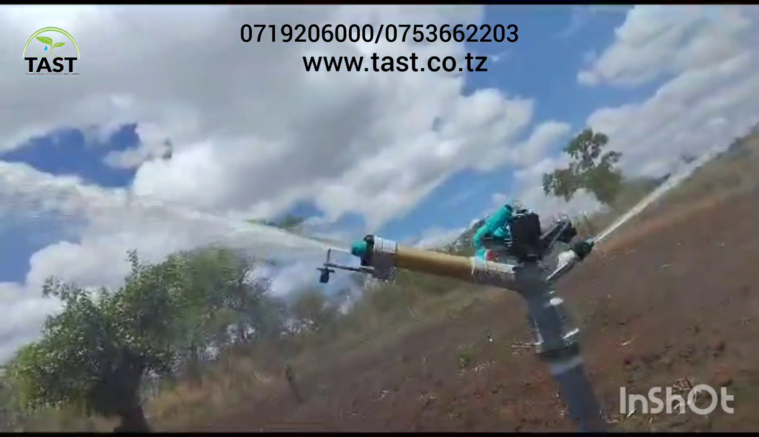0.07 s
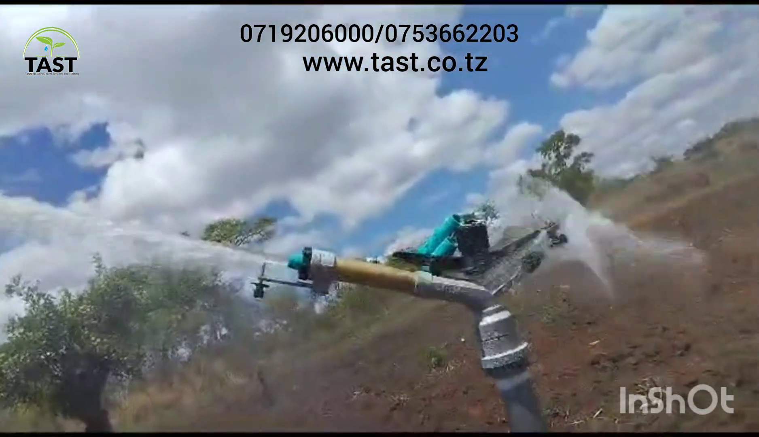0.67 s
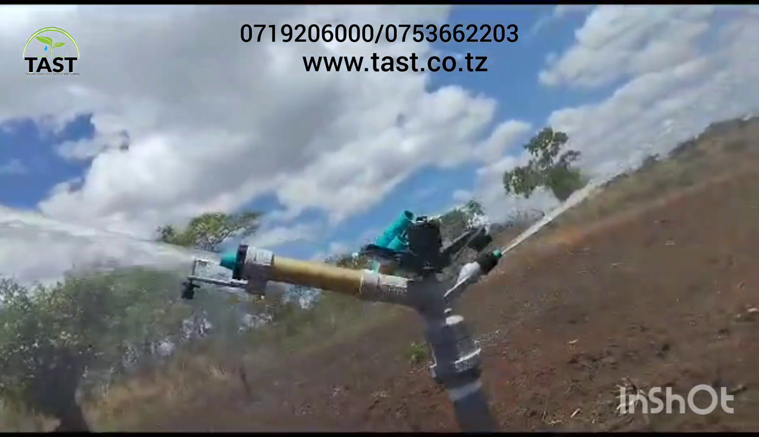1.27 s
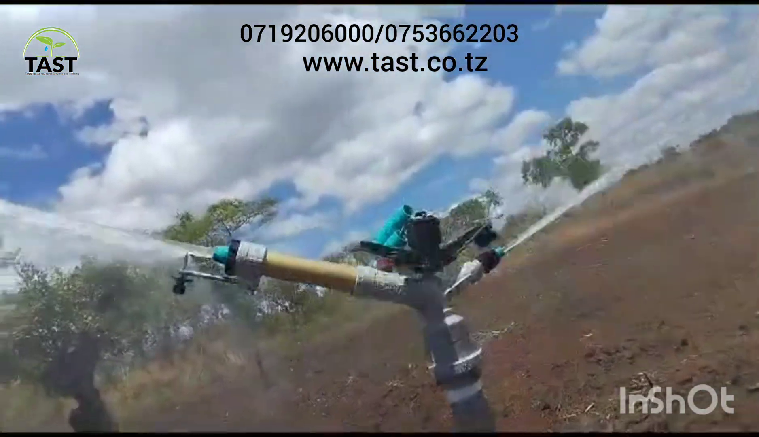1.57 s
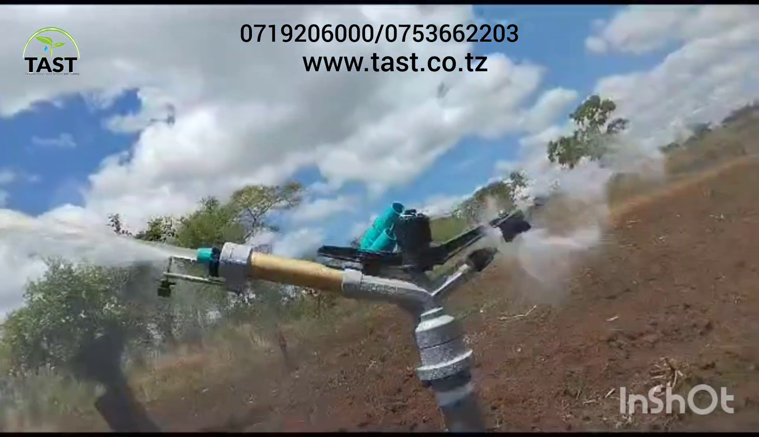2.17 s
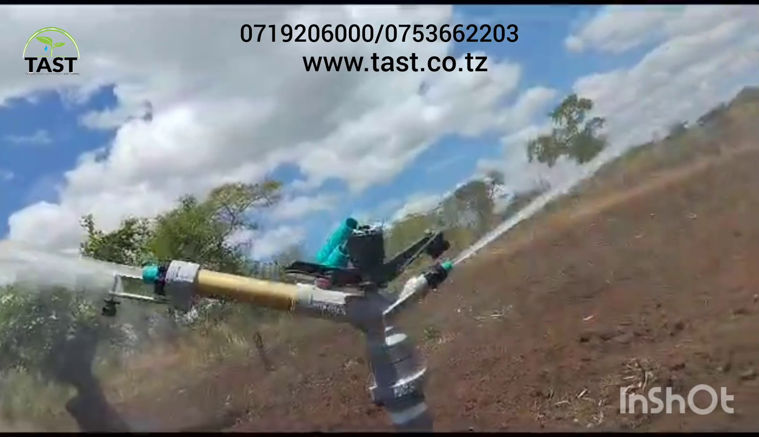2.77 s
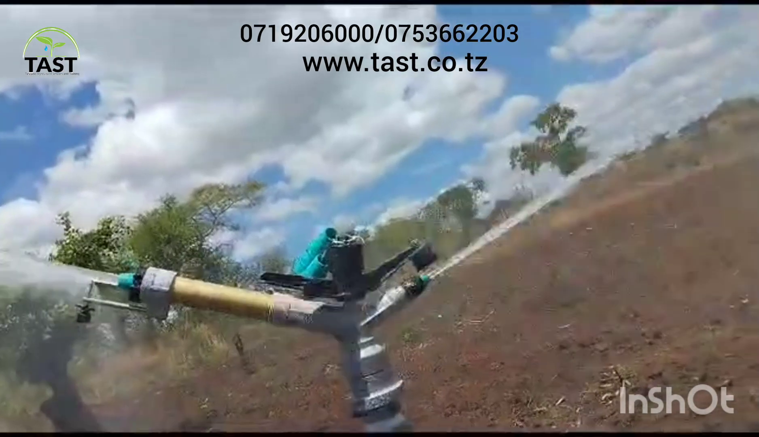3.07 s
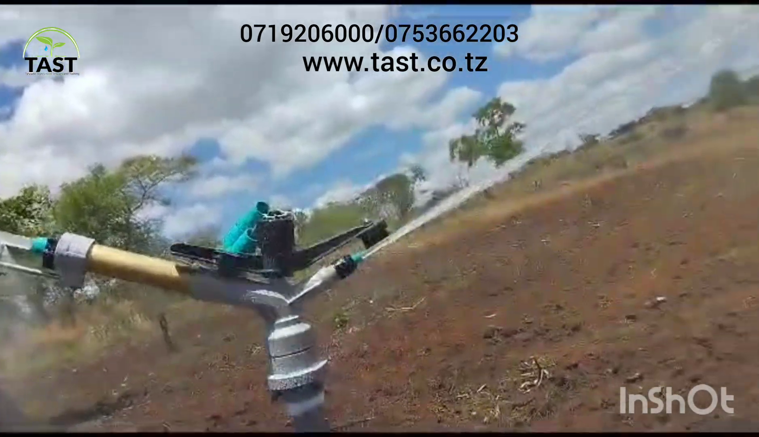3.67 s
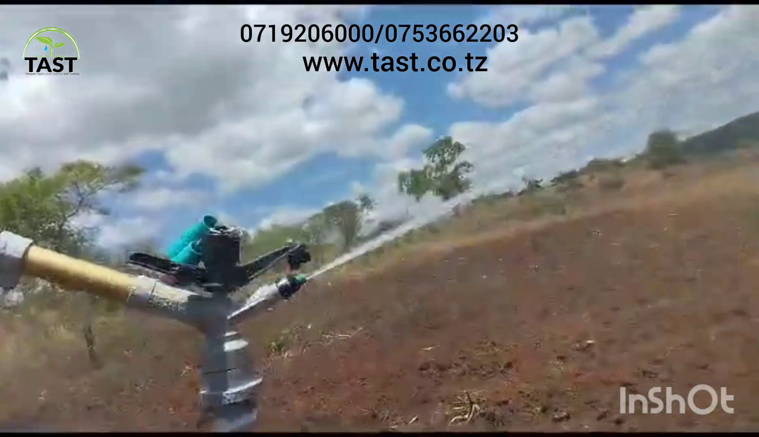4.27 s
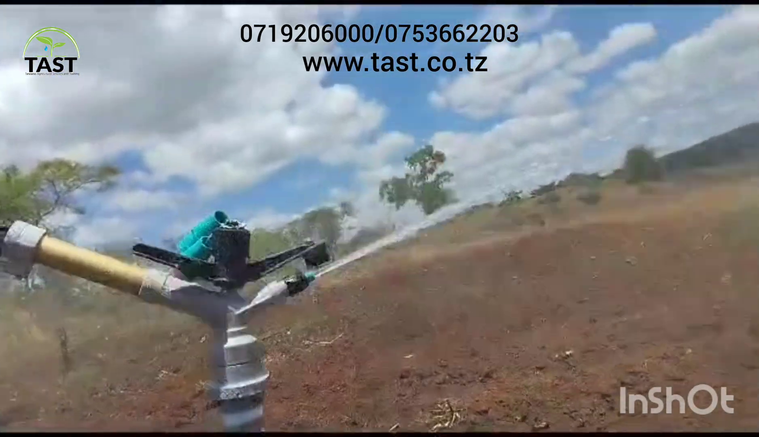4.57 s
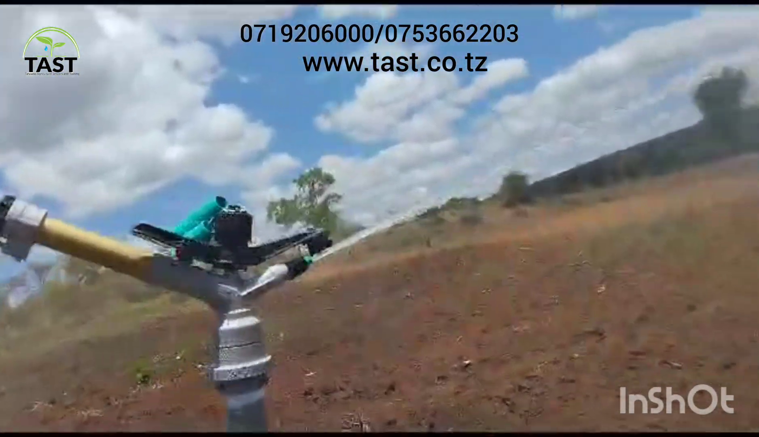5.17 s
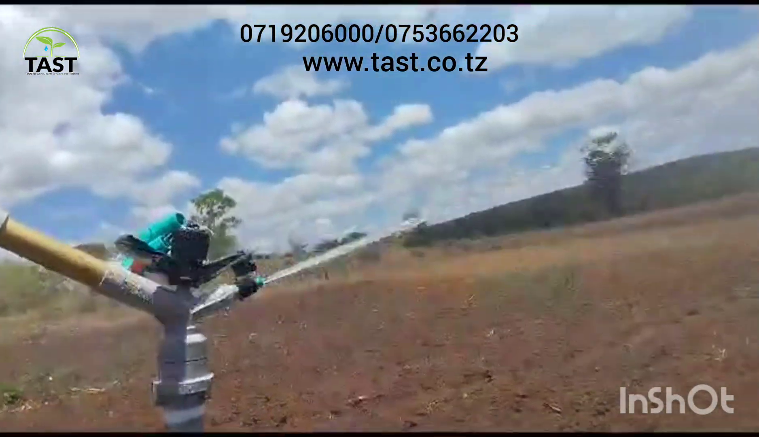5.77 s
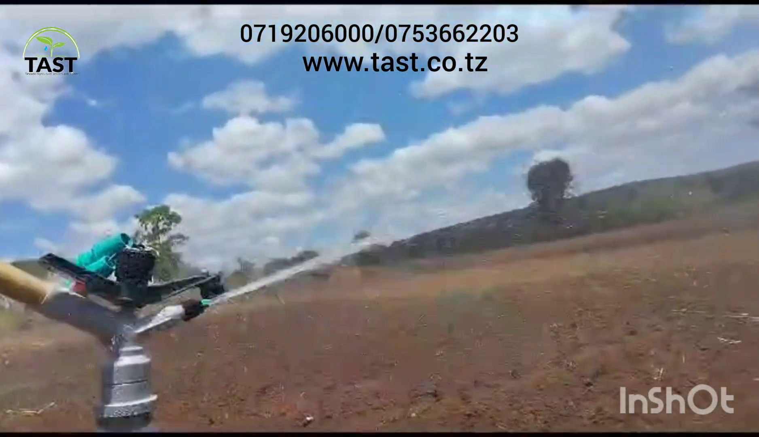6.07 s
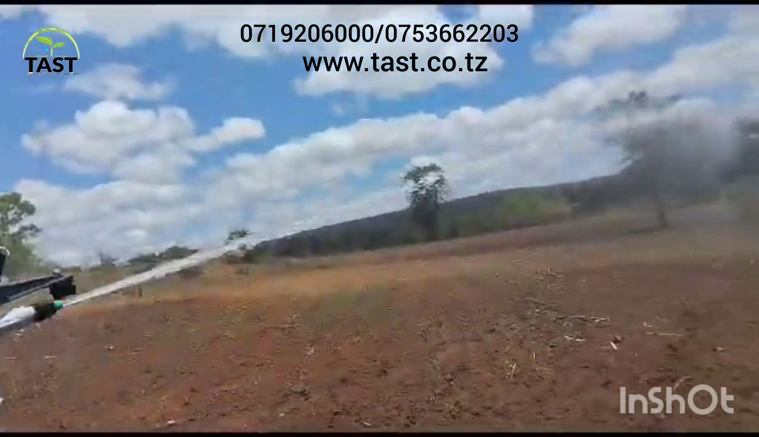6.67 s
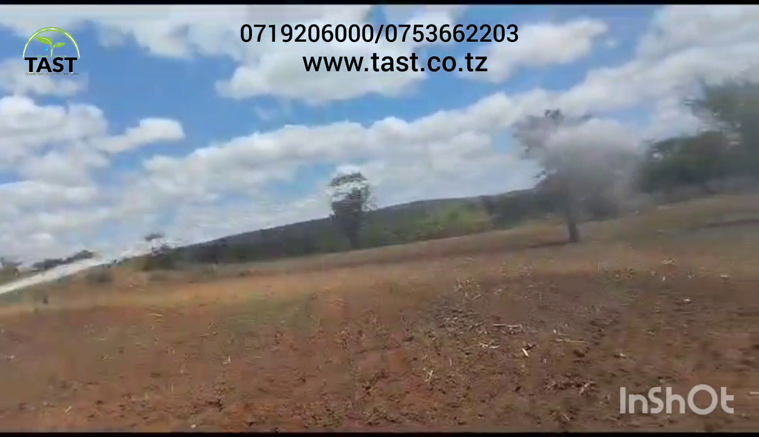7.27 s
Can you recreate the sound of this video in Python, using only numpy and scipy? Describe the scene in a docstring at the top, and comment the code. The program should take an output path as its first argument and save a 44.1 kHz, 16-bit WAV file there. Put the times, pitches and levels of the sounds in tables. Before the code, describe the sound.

A big impact sprinkler hisses steadily close by, its arm clacking and splashing in a regular rhythm while wind buffets the microphone.

```python
"""A dry field, close to a big turning impact sprinkler. Its jet roars and hisses steadily; 2.6 times a
second the drive arm slaps into the water, throws a burst of spray, gulps as its spoon fills, strikes
the body and clacks back onto its stop. Gusts buffet the microphone, whose gain ducks under loud
strokes; stray drops tick nearby."""
import sys
import numpy as np
from scipy import signal
from scipy.fft import rfft, irfft, next_fast_len
from scipy.io import wavfile
from scipy.ndimage import uniform_filter1d, minimum_filter1d, map_coordinates

SR = 44100
rng = np.random.default_rng(int(sys.argv[2]) if len(sys.argv) > 2 else 0)


def file_out(sig):
    """Save sig as 16-bit WAV at sys.argv[1]."""
    # one column per channel
    cols = np.atleast_2d(sig).T
    # limit, then scale
    lim = np.clip(cols, -1, 1)
    pcm = np.round(lim * 32767).astype(np.int16)
    wavfile.write(sys.argv[1], SR, pcm)


N = 327663


def amp(db):
    """Decibels to gain."""
    return 10 ** (np.asarray(db) / 20)


def unit(x):
    """Scale to rms 1."""
    return x / np.sqrt(np.mean(x ** 2) + 1e-20)


def decay(t, t60):
    """Exponential fall, 60 dB in t60 seconds."""
    return amp(-60 * t / t60)


def at(rows, s):
    """Each column after the time, interpolated at s seconds."""
    times, *cols = np.transpose(rows)
    return [np.interp(s, times, c) for c in cols]


def curves(rows):
    """Each column after the time, one value per sample."""
    return at(rows, np.arange(N) / SR)


def add(track, s, sound):
    """Mix a sound into the track at s seconds."""
    start = max(0, round(s * SR))
    part = sound[:max(0, N - start)]
    track[start:start + len(part)] += part


def wobble(rate_hz, size=N):
    """Smooth random curve, rate_hz knots a second."""
    knots = rng.standard_normal(int(size * rate_hz / SR) + 4)
    return map_coordinates(knots, [np.arange(size) * rate_hz / SR])


def colour(x, spectrum):
    """Shape x by (f/Hz, level/dB) points on a log axis; rms 1."""
    hz, db = np.transpose(spectrum)
    m = next_fast_len(len(x) + 8192)
    gain = amp(np.interp(np.log(np.fft.rfftfreq(m, 1 / SR) + 1), np.log(hz), db))
    return unit(irfft(rfft(x, m) * gain, m)[:len(x)])


def noise(spectrum, size=N):
    """Coloured noise; rms 1."""
    return colour(rng.standard_normal(size), spectrum)


def band(track, width_hz):
    """Narrow noise centred on (t/s, f/Hz) points; rms 1."""
    lowpass = signal.butter(2, width_hz, fs=SR, output="sos")
    swirl = signal.sosfilt(lowpass, rng.standard_normal((2, N)))
    phase = 2 * np.pi * np.cumsum(curves(track)[0]) / SR
    return unit(swirl[0] * np.cos(phase) + swirl[1] * np.sin(phase))


def patchy(x, depth_db, frames):
    """Random patches of gain, some 500 Hz wide."""
    z = signal.stft(x, nperseg=512)[2]
    field = uniform_filter1d(uniform_filter1d(rng.standard_normal(z.shape), 6, 0), frames, 1)
    return signal.istft(z * amp(depth_db * unit(field)), nperseg=512)[1][:len(x)]


def droplets(per_s, spread_db, grain_db):
    """Tiny impacts of scattered size on a bed of smooth noise; rms 1."""
    hits = (rng.random(N) < per_s / SR) * amp(spread_db * np.clip(rng.standard_normal(N), -2, 2))
    grains = unit(hits * rng.choice([-1, 1], N))
    return unit(amp(grain_db) * grains + rng.standard_normal(N))


# Spectra of roar, hiss and mist: f/Hz, level/dB
ROAR_SPECTRUM = [(100, -15.5), (450, 2), (800, -1.5), (1150, -5), (1500, 1.5), (2100, 3), (2550, -5),
                 (3050, -1.5), (4200, -6), (4900, -4.5), (6500, -9.5), (12000, -37)]
HISS_SPECTRUM = [(2500, -5), (4500, -19), (5800, -2.5), (6900, 2), (8400, 2), (10000, -2.5), (11200, -7),
                 (12400, -3.5), (13700, -8.5), (16000, -6.5)]
MIST_SPECTRUM = [(5000, -16.5), (7500, -3), (8800, -2.5), (10000, 0), (11500, -4), (14000, -8), (16000, -5)]
# Roar and hiss over time; the roar sinks briefly near 6.65 s: t/s, roar level/dB, hiss level/dB
STREAM_LEVELS = [(0, -35.5, -32.5), (1.5, -34, -32), (3.1, -34, -34), (4.9, -35.5, -35.5), (5.9, -35, -32),
                 (6.65, -37, -33), (7.4, -34.5, -31.5)]
# Hollow note of the nozzle: t/s, f/Hz
NOZZLE_NOTE = [(0, 1605), (1.2, 1623), (3.3, 1961), (6.4, 1935), (7.4, 2104)]
# Thin sheen in the hiss: t/s, f/Hz, level/dB re hiss
HISS_SHEEN = [(0, 12300, -29), (1.4, 12140, -7.5), (2.6, 12340, -9.5), (3.2, 14400, -17),
              (3.9, 14450, -8.5), (5.6, 13320, -11), (7.4, 12500, -28)]


def jet(nozzle_db=-7.5):
    """The stream roars with the nozzle's hollow note and hisses as it tears into drops."""
    roar_db, hiss_db = curves(STREAM_LEVELS)
    roar = noise(ROAR_SPECTRUM) + amp(nozzle_db) * band(NOZZLE_NOTE, width_hz=200)
    tearing = patchy(droplets(per_s=1200, spread_db=4.5, grain_db=-8), depth_db=1.2, frames=60)
    sputter = unit(amp(6.5 * np.minimum(wobble(330), 2.6)))  # the finest drops come in spits
    sheen = amp(curves(HISS_SHEEN)[1]) * band(HISS_SHEEN, width_hz=440)
    fizz = amp(-4.5) * patchy(noise(MIST_SPECTRUM), depth_db=1.5, frames=90)
    hiss = colour(tearing, HISS_SPECTRUM) + sputter * (sheen + fizz)
    return amp(roar_db + 0.54 * wobble(13)) * roar + amp(hiss_db + 0.87 * wobble(70)) * hiss


# Spectra of eddies, large to small: f/Hz, level/dB
RUMBLE_SPECTRUM = [(10, -10), (25, 0.5), (50, -0.5), (100, -4.5), (150, -18), (300, -46), (700, -77)]
FLUTTER_SPECTRUM = [(50, -23), (120, 1.5), (180, -0.5), (250, -7.5), (340, -16.5), (700, -27), (1500, -49)]
BUFFET_SPECTRUM = [(180, 4), (320, 4.5), (480, -1), (750, -19.5), (1500, -33)]
# Wind strength: t/s, rumble level/dB
WIND_LEVEL = [(0, -20.5), (.3, -17.5), (.66, -15.5), (.73, -36), (.83, -22), (1.06, -17.5), (1.12, -29.5),
              (1.18, -17), (1.5, -20), (2.35, -19), (2.86, -19), (2.96, -26.5), (3.7, -24.5), (3.9, -40),
              (5.56, -35), (5.66, -27.5), (6.05, -33.5), (6.48, -32), (6.64, -39.5), (7.32, -28.5),
              (7.43, -35)]
# Hardest buffets: t/s, level/dB, half-width/s
HARD_BUFFETS = [(0.258, -22.5, 0.056), (1.24, -25, 0.05), (2.615, -33, 0.035)]


def wind(full_gust_db=-19):
    """Eddies rumble on the microphone; faster air makes smaller ones that flutter and buffet."""
    t = np.arange(N) / SR
    wind_db, = curves(WIND_LEVEL)
    gust_db = wind_db - full_gust_db
    swells = unit(amp(1.16 * wobble(20) + 2.1 * wobble(60)))
    rumble = amp(wind_db) * noise(RUMBLE_SPECTRUM)
    lumps = amp(3.2 * wobble(45) + 2 * np.minimum(wobble(18), 1))
    flutter = amp(-24 + 1.63 * gust_db) * unit(noise(FLUTTER_SPECTRUM) * lumps)
    peaks = sum(amp(db) * np.exp(-((t - s) / width_s) ** 2) for s, db, width_s in HARD_BUFFETS)
    buffet = (amp(-42.5 + 2.5 * gust_db) + peaks) * unit(noise(BUFFET_SPECTRUM) * lumps)
    return swells * (rumble + flutter + buffet)


def throw(t, lead_s=0.030, hold_s=0.054, rise_db_per_s=5000, fall_db_per_s=1100):
    """Envelope of thrown water, t seconds from the strike; it dips while the spoon fills."""
    early = np.maximum(-lead_s - t, 0)
    late = np.maximum(t + lead_s - hold_s, 0)
    dip_db = 2 * np.exp(-((t + 0.007) / 0.0056) ** 2)
    return amp(-rise_db_per_s * early - fall_db_per_s * late - dip_db)


# Arm strokes: strike t/s, relative level/dB
ARM_STROKES = [(0.1166, 0.5), (0.4969, 1), (0.8763, -1.5), (1.255, -1), (1.6354, 0.5), (2.0153, -2.5),
               (2.397, 0), (2.7797, 2), (3.159, 3), (3.538, 3), (3.9193, 0.5), (4.2994, 1.5), (4.679, 0.5),
               (5.0598, 1), (5.441, 0), (5.8221, 0.5), (6.204, -2), (6.586, -4.5), (6.9697, -3),
               (7.3503, -2.5)]
# Spectrum of coarse drops: f/Hz, level/dB
SPRAY_SPECTRUM = [(150, -42), (400, -10), (1000, -26), (1500, -5.5), (2600, -6), (3400, -2), (5200, -2.5),
                  (6300, 4.5), (7800, 4), (9000, 3.5), (11000, -40)]
# Sharpest part of the splash as the fan of water swings: t/s, f/Hz
SPLASH_PEAK = [(.1, 8150), (.5, 7750), (2.7, 8300), (3.6, 8100), (4.3, 6450), (5.1, 6420), (6.6, 8000),
               (7.35, 7400)]
# Ring of the splash in the wet arm: t/s, level/dB re splash
WET_RING_LEVEL = [(0, -20), (1.7, -15), (2.8, -9.5), (3.8, -24), (6.2, -15), (7.1, -6)]
# Mist as the sprinkler turns: t/s, level/dB
MIST_LEVEL = [(.1, -19), (1.3, -17), (2.5, -17), (3.2, -15.5), (4.4, -19.5), (5.4, -15.5), (6.6, -16),
              (7.35, -18.5)]


def spray(swell_db_per_s=70, mist_lead_s=0.00089, push_lead_s=0.023, ring_hz=4290):
    """The arm shatters the jet into coarse drops and fine mist, with a low push on entry."""
    coarse, fine, push = np.zeros((3, N))
    t = np.arange(-SR // 20, SR // 10) / SR
    for s, strength_db in ARM_STROKES:
        add(coarse, s + t[0], amp(-19 + 0.72 * strength_db + swell_db_per_s * t) * throw(t))
        add(fine, s + t[0], amp(at(MIST_LEVEL, s)[0]) * throw(t + mist_lead_s))
        add(push, s + t[0], amp(-31) * np.exp(-((t + push_lead_s) / 0.014) ** 2))
    drops, mist = [patchy(droplets(per_s=5000, spread_db=3.5, grain_db=-2), depth_db=2, frames=6)
                   for _ in range(2)]
    wet_ring = amp(curves(WET_RING_LEVEL)[0]) * band([(0, ring_hz)], width_hz=220)
    splash = colour(drops, SPRAY_SPECTRUM) + amp(-4.5) * band(SPLASH_PEAK, width_hz=390) + wet_ring
    surge = amp(1.4 * wobble(450))
    thud = noise(RUMBLE_SPECTRUM) + amp(-12) * noise(FLUTTER_SPECTRUM)
    return (coarse * splash + fine * colour(mist, MIST_SPECTRUM)) * surge + push * thud


# Arm modes: f/Hz, t60/s, slap level/dB, strike level/dB, stop level/dB
ARM_MODES = [(1517, 0.025, -10.5, -15, -11), (1800, 0.022, -27, -28, -15), (2220, 0.043, -13, -34, -7.5),
             (3176, 0.022, 2, -7, 2.5), (3329, 0.037, -5.5, -7.5, 9.5), (3980, 0.034, -14, -2, -3),
             (4300, 0.032, -12.5, -2.5, 2), (4580, 0.023, -15, -1, -11), (5043, 0.061, -14.5, -10.5, 12.5),
             (8700, 0.081, -23, -4, -17), (9600, 0.012, -1, 9.5, -8), (12100, 0.058, -15, -4, 0),
             (14300, 0.028, -20, -1.5, -10), (14780, 0.031, -20, -9, -4), (15800, .05, -13, -24, 0)]


def ring(levels_db, blur_rad, scatter_db=1.5, detune=0.0022, attack_s=0.0006):
    """The arm rings; water on it detunes and blurs each mode."""
    t = np.arange(SR // 10) / SR
    out = np.zeros(len(t))
    for (hz, t60, *_), db in zip(ARM_MODES, levels_db):
        phase = 2 * np.pi * (hz * (1 + detune * rng.normal()) * t + rng.random())
        phase += blur_rad * wobble(403, len(t))
        out += amp(db + scatter_db * rng.normal()) * decay(t, t60) * np.sin(phase)
    return out * (1 - np.exp(-t / attack_s))


# Spectrum of a sharp contact: f/Hz, level/dB
CRACK_SPECTRUM = [(300, -22), (1100, -53), (1480, 4), (1850, -14), (2250, -1.5), (2750, -6), (4200, 0.5),
                  (5400, 0), (6400, 0.5), (8500, 2.5), (11000, -7.5), (16000, -3)]


def crack(t60_s, tail_db, tail_t60_s, attack_s):
    """A contact's sharp noise, then the short rattle of the barrel."""
    t = np.arange(SR // 10) / SR
    fade = decay(t, t60_s) + amp(tail_db) * decay(t, tail_t60_s)
    return noise(CRACK_SPECTRUM, len(t)) * fade * (1 - np.exp(-t / attack_s))


# Contacts as the sprinkler turns: t/s, slap level/dB, strike level/dB
CONTACT_LEVELS = [(.1, -15.5, -9.5), (.8, -8, -7), (2.5, -7.5, -5.5), (3.2, -19, -13.5), (4.4, -12.5, -10),
                  (6.0, -8.5, -9), (7.35, -13.5, -5.5)]
# Ring on the stop: t/s, low-mode level/dB, high-mode level/dB
STOP_LEVELS = [(.1, -14.5, -32), (1.4, -8, -28), (2.0, -13, -28), (2.5, -12.5, -24), (3.4, -24, -22.5),
               (4.6, -22.5, -33), (5.45, -17.5, -26.5), (6.5, -13.5, -39), (7.35, -10, -24)]


def arm(slap_lead_s=0.0295, stop_lag_s=0.0375):
    """Three contacts a stroke: slap on the jet, strike on the body, clack on the stop."""
    out = np.zeros(N)
    hz, _, slap_modes, strike_modes, stop_modes = np.transpose(ARM_MODES)
    for s, strength_db in ARM_STROKES:
        slap_db, strike_db = at(CONTACT_LEVELS, s)
        stop_db = np.interp(hz, [3400, 5000], at(STOP_LEVELS, s))
        slap = ring(slap_modes, blur_rad=0.3)
        slap += amp(-3) * crack(t60_s=0.01, tail_db=-20, tail_t60_s=0.03, attack_s=0.0005)
        strike = ring(strike_modes, blur_rad=0.42)
        strike += amp(7.5) * crack(t60_s=0.008, tail_db=-22, tail_t60_s=0.05, attack_s=0.0004)
        clack = crack(t60_s=0.0055, tail_db=-25, tail_t60_s=0.066, attack_s=0.0011)
        stop_ring = ring(stop_modes + stop_db + strength_db, blur_rad=0.3)
        add(out, s - slap_lead_s, amp(slap_db) * slap)
        add(out, s, amp(strike_db + strength_db) * strike)
        add(out, s + stop_lag_s, amp(9.5 + 1.4 * strength_db) * clack + stop_ring)
    return out


# Upper mids of the strokes: t/s, level/dB
UPPER_MID_GAIN = [(.1, 3.5), (1.2, -0.5), (2.0, 0), (3.3, 2), (4.9, -3), (5.8, -1.5), (7.35, 1.5)]


def turning(x, band_hz=(2980, 5570)):
    """The strokes sound fuller or hollower as the sprinkler turns."""
    mids = signal.sosfiltfilt(signal.butter(4, band_hz, "bandpass", fs=SR, output="sos"), x)
    return x + (amp(curves(UPPER_MID_GAIN)[0]) - 1) * mids


# Modes of the spoon's hollow: f/Hz, t60/s, level/dB
SPOON_MODES = [(354, 0.031, -6.5), (459, 0.03, -4), (733, 0.026, -3.5), (1478, 0.025, -2), (1610, 0.017, 3),
               (2144, 0.035, 0.5), (2650, 0.048, -3.5)]


def gulps(lead_s=0.0085, attack_s=0.0016, detune=0.041):
    """Just before each strike the spoon fills with a short hollow gulp."""
    out = np.zeros(N)
    t = np.arange(SR // 16) / SR
    onset = 1 - np.exp(-t / attack_s)
    for s, strength_db in ARM_STROKES:
        hollow = np.zeros(len(t))
        for hz, t60, db in SPOON_MODES:
            envelope = amp(db + 2 * rng.normal()) * decay(t, t60)
            phase = 2 * np.pi * (hz * (1 + detune * rng.normal()) * t + rng.random())
            hollow += envelope * np.sin(phase)
        add(out, s - lead_s, amp(-16.5 + 0.72 * strength_db) * hollow * onset)
    return out


# Loudest stray drops: t/s, level/dB
LOUD_DROPS = [(0.4219, -18), (0.9812, -18), (2.2827, -16), (3.6122, -16), (4.3904, -13), (7.1307, -19)]


def stray_drops(small_per_s=1.5, small_db=-23, spread_db=2):
    """Single drops tick close by; smaller ones fall at random."""
    out = np.zeros(N)
    t = np.arange(SR // 50) / SR
    small = [(rng.uniform(0, N / SR), rng.normal(small_db, spread_db))
             for _ in range(round(small_per_s * N / SR))]
    for s, db in LOUD_DROPS + small:
        tick = noise(CRACK_SPECTRUM, len(t)) * decay(t, t60=0.008)
        add(out, s, amp(db) * tick)
    return out


def scene():
    """Open ground: everything arrives dry, in mono."""
    strokes = turning(arm() + spray()) + gulps()
    return (strokes + jet() + stray_drops() + wind())[None]


def record(dry, threshold_db=-21, slope=0.23, smooth_s=0.026, ceiling=0.69, top_hz=15800):
    """The gain ducks under loud sound and recovers; peaks saturate; the top band is cut."""
    level_db = 10 * np.log10(np.abs(uniform_filter1d(dry[0] ** 2, SR // 100)) + 1e-10)
    wanted_db = -slope * np.maximum(level_db - threshold_db, 0)
    held_db = minimum_filter1d(wanted_db, 2001, origin=1000)  # 45 ms hold
    pole = np.exp(-1 / (smooth_s * SR))
    ducked = dry * amp(signal.lfilter([1 - pole], [1, -pole], held_db))
    saturated = ducked / (1 + np.abs(ducked / ceiling) ** 6) ** (1 / 6)
    m = next_fast_len(N + 8192)
    passband = np.fft.rfftfreq(m, 1 / SR) < top_hz
    return irfft(rfft(saturated, m) * passband, m)[:, :N]


dry = scene()
out = record(dry)
file_out(out)
```